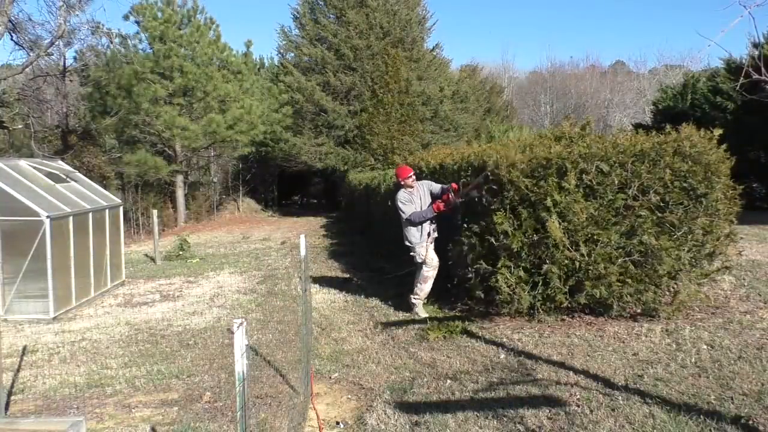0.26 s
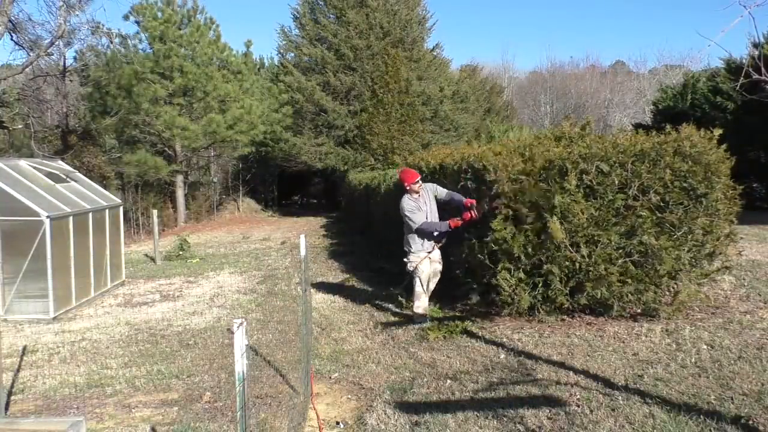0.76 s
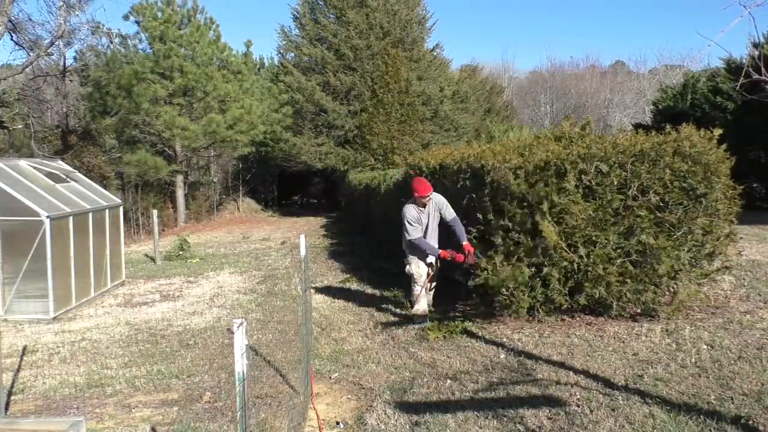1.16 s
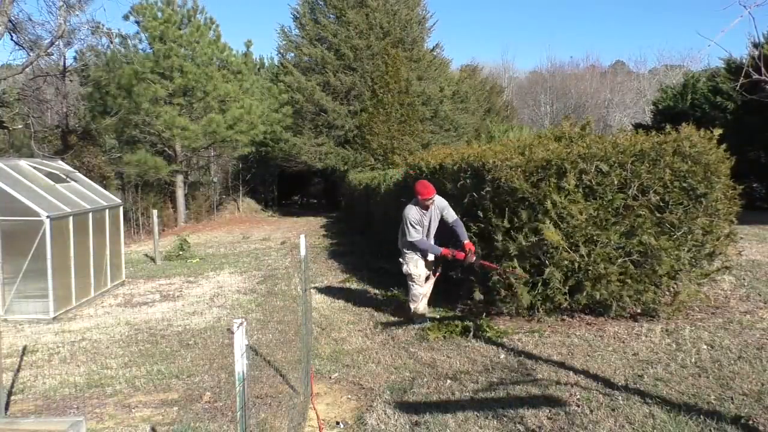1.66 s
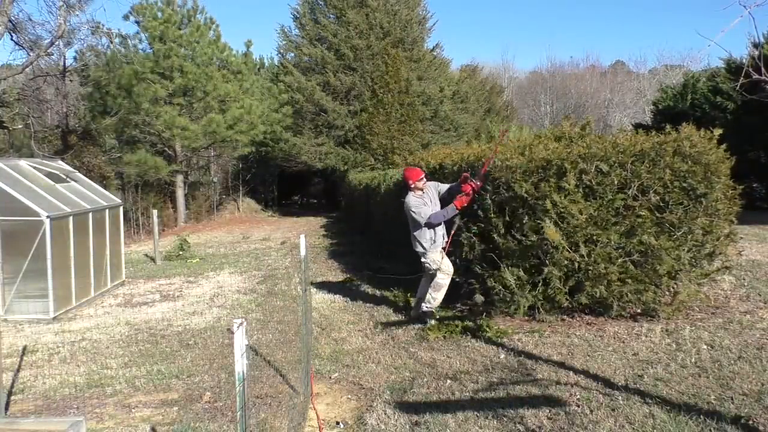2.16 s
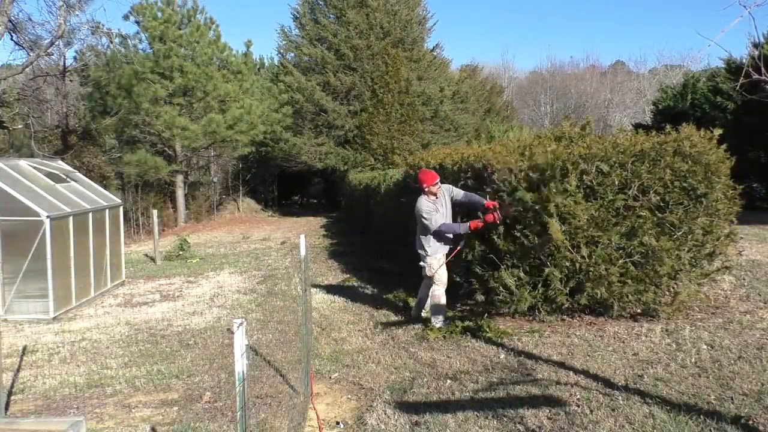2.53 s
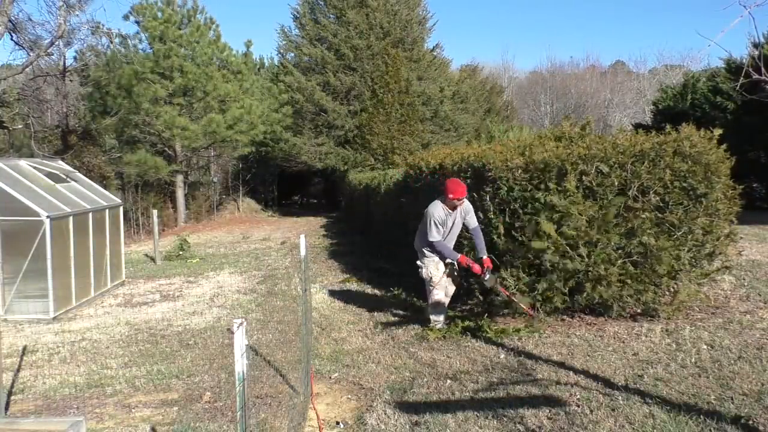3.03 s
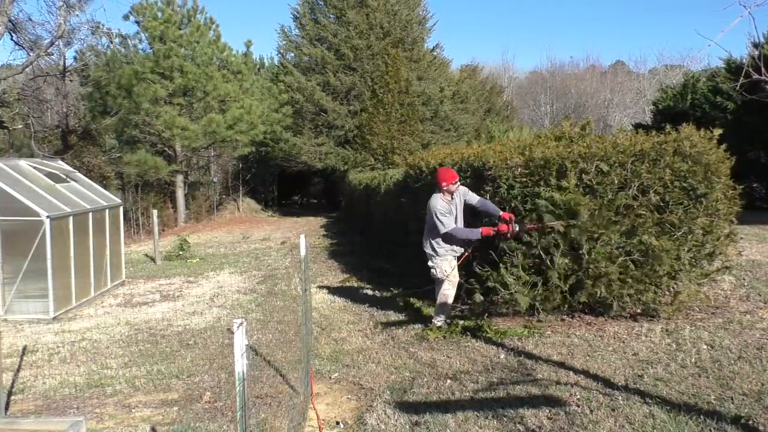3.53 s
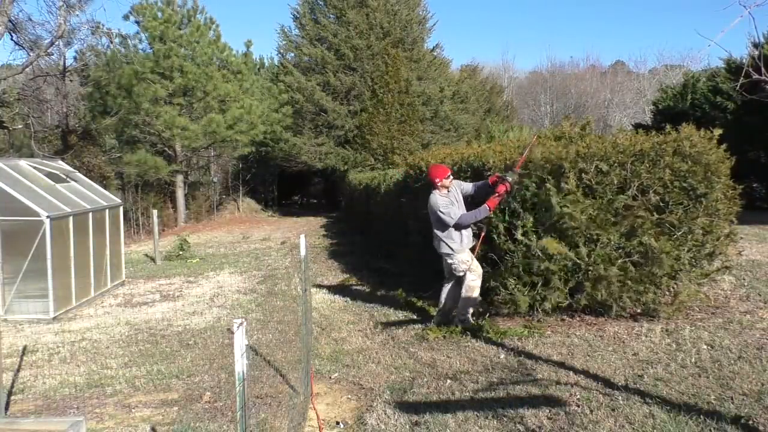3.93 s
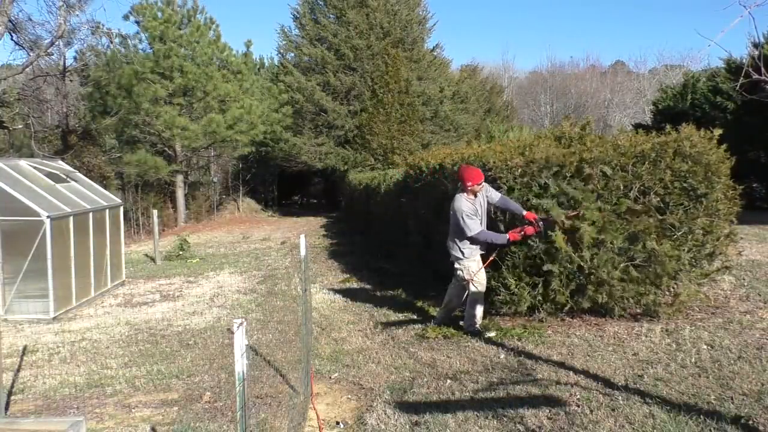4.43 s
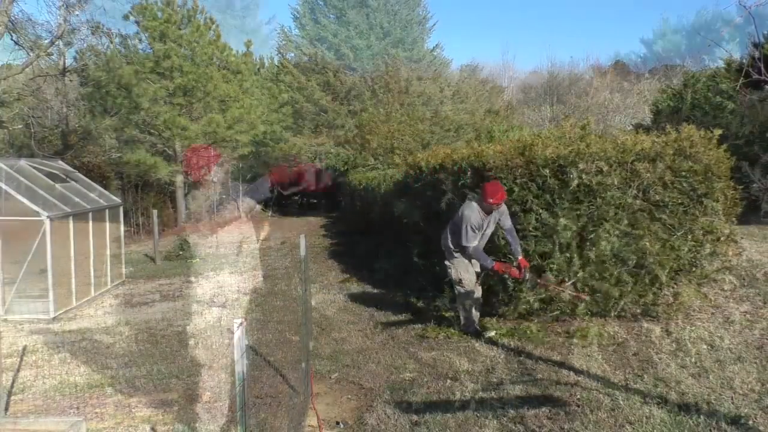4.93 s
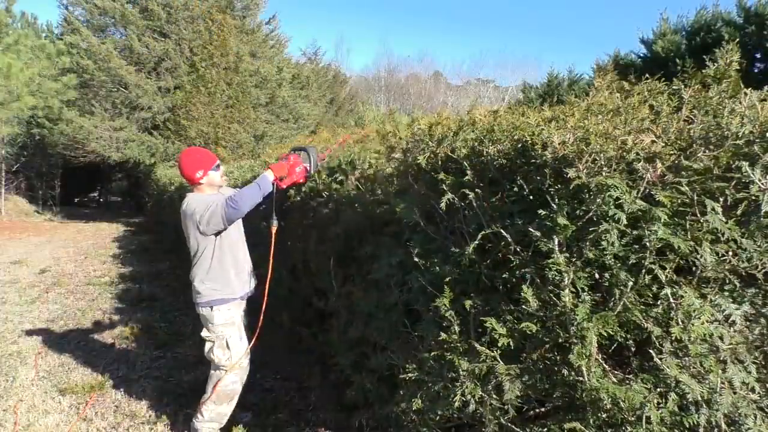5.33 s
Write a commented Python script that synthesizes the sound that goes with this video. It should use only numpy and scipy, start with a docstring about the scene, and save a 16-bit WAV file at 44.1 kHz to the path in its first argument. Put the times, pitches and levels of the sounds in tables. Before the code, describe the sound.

Continuous harsh buzz of a corded hedge trimmer outdoors: nasal motor whine, hollow plastic rattle and metallic scraping of fast blades. Pitch wavers about every second as foliage slows it, with small bright cracks of twigs. Around five seconds it labours to its lowest pitch with rough squeals, then quickly recovers as the microphone viewpoint moves closer. Dry open air, no room reverb, only a faint outdoor bed.

```python
"""In a garden, some metres away, a corded electric hedge trimmer sweeps up and down a thick hedge.
Shaft-locked tones make the gear, fan and commutator whine; they sag and fray under load.
Shaped noise, pulsed by the blade strokes, makes the rattle and the shearing; bursts make snaps and bites.
The rattle, cutting and snaps also echo off the lawn, so their colour sweeps as the tool rises and falls."""
import sys
import numpy as np
from scipy import signal
from scipy.fft import rfft, irfft, next_fast_len
from scipy.io import wavfile
from scipy.ndimage import uniform_filter1d, map_coordinates

SR = 44100
rng = np.random.default_rng(int(sys.argv[2]) if len(sys.argv) > 2 else 0)


def wav_record(signal):
    """Record a signal, one row per channel, as 16-bit PCM in the file named by sys.argv[1]."""
    frames = np.transpose(np.atleast_2d(signal))
    bounded = np.clip(frames, -1, 1)
    # unit amplitude maps onto the largest positive 16-bit level
    quanta = np.round(bounded * 32767).astype(np.int16)
    wavfile.write(sys.argv[1], SR, quanta)


N = 246519

PINION_TEETH, WHEEL_TEETH = 5, 49  # the shaft's pinion drives the crank wheel
FAN_BLADES = 6
COMMUTATOR_ORDER = 17  # cycles per shaft turn
LISTENER_HEIGHT_M, CHEST_HEIGHT_M = 1.5, 1.5
SOUND_M_PER_S = 343
TOP_HZ = 15750

# gearbox noise spectrum: freq_hz, relative_db
GEARBOX_SPECTRUM = [(100, -60), (500, -43), (1200, -11), (1650, 1), (2200, -0.5), (2750, 0.5), (3100, -2),
                    (4200, -6.5), (4900, -12.5), (6500, -14.5), (8000, -19.5), (15000, -25)]
# gear case resonances: centre_hz, width_hz, lift_db
GEAR_CASE_MODES = [(1881, 95, 7.5), (2299, 132, 8.5), (2740, 61, 3.5), (3510, 59, 4.5), (4310, 88, 4.5)]


def amp(db):
    """Decibels to gain."""
    return 10 ** (np.asarray(db) / 20)


def unit(x):
    """Scale to rms 1."""
    return x / np.sqrt(np.mean(x ** 2) + 1e-20)


def clock():
    """Time of every sample, s."""
    return np.arange(N) / SR


def curves(rows):
    """Linear per-sample curve for each column after the time."""
    time_s, *columns = np.transpose(rows)
    return [np.interp(clock(), time_s, column) for column in columns]


def eased(points):
    """Per-sample curve gliding smoothly between turning points."""
    time_s, values = np.transpose(points)
    index = np.arange(len(time_s))
    place = np.interp(clock(), time_s, index)
    glide = np.sin(np.pi / 2 * (place % 1)) ** 2
    return np.interp(np.floor(place) + glide, index, values)


def wobble(knots_per_s):
    """Smooth random curve through Gaussian knots."""
    knots = rng.standard_normal(N // 16)
    return map_coordinates(knots, [clock() * knots_per_s], mode="wrap")


def filtered(x, response):
    """Multiply the spectrum of x by a response of frequency in Hz."""
    size = next_fast_len(N + 8192)  # zero-padded
    freq_hz = np.fft.rfftfreq(size, 1 / SR)
    return irfft(rfft(x, size) * response(freq_hz), size)[:N]


def lift_db(freq_hz, modes):
    """Sum of the resonance peaks at a frequency, dB."""
    return sum(peak_db / (1 + (2 * (freq_hz - centre_hz) / width_hz) ** 2)
               for centre_hz, width_hz, peak_db in modes)


def coloured(x, spectrum, modes=()):
    """Shape x by a spectrum plus resonances, at rms 1."""
    knot_hz, knot_db = np.transpose(spectrum)

    def response(freq_hz):
        base_db = np.interp(np.log(freq_hz + 1), np.log(knot_hz), knot_db)
        return amp(base_db + lift_db(freq_hz, modes))

    return unit(filtered(x, response))


def noise(spectrum, modes=()):
    """Fresh coloured noise at rms 1."""
    return coloured(rng.standard_normal(N), spectrum, modes)


def swung(x, patchy_db):
    """Narrow bands swell and fade at random, at rms 1."""
    bins = signal.stft(x, nperseg=1024)[2]
    field = rng.standard_normal(bins.shape)
    field = uniform_filter1d(field, size=3, axis=0)  # across frequency
    field = uniform_filter1d(field, size=9, axis=1)  # across time
    return unit(signal.istft(bins * amp(patchy_db * unit(field)))[1][:N])


def strokes(turns, out_db, back_db):
    """Blade-stroke gain swinging at once and twice the crank rate."""
    crank_rad = 2 * np.pi * turns * PINION_TEETH / WHEEL_TEETH
    return unit(amp(out_db * np.cos(crank_rad) + back_db * np.cos(2 * crank_rad)))


def clack(turns, decay_strokes, depth):
    """Gain that jumps as the blades reverse, twice a crank turn, then dies away."""
    stroke = (2 * turns * PINION_TEETH / WHEEL_TEETH) % 1
    return unit(1 + depth * np.exp(-stroke / decay_strokes))


def tone(turns, order, rough, flutter_db, spread_hz):
    """Shaft order: a fluttering line with a skirt of narrow noise."""
    skirt = wobble(spread_hz) + 1j * wobble(spread_hz)
    line = (1 + rough * skirt) / np.sqrt(1 + 2 * rough ** 2)
    line = line * amp(flutter_db * wobble(35))
    return unit(np.real(line * np.exp(2j * np.pi * order * turns)))


def outdoor_air():
    """Faint, steady low-pitched noise of the open air."""
    # spectrum: freq_hz, relative_db
    air_spectrum = [(20, -16), (45, -4.5), (85, 0), (150, 0), (300, 2.5), (1000, -15), (8000, -39)]
    return amp(-69.0) * noise(air_spectrum)


def lawn(x, height_m, near, share, dull_hz, phase_rad):
    """Direct sound plus a grass echo, later for a higher tool; grass dulls it and holds back its phase."""
    far_m, near_m = 8.07, 4.4
    near_echo_db = -5  # grass returns less of a steep echo
    soft = filtered(x, lambda hz: share * np.exp(-1j * phase_rad) / (1 + (hz / dull_hz) ** 2))

    def echo(distance_m):
        extra_path_m = 2 * height_m * LISTENER_HEIGHT_M / distance_m
        lag_s = extra_path_m / SOUND_M_PER_S
        return map_coordinates(soft, [(clock() - lag_s) * SR], order=1)

    return x + (1 - near) * echo(far_m) + near * amp(near_echo_db) * echo(near_m)


def snaps(rise_s, t60_s):
    """Each thicker twig parts with one short, bright crack."""
    # snapping twigs: start_s, relative_level_db
    snap_rows = [(0.515, -24.5), (0.8127, -27), (1.1785, -19.5), (1.7612, -20), (2.8297, -24.5),
                 (3.3308, -27), (3.7611, -31), (4.4398, -22.5), (4.5201, -23.5), (4.792, -25),
                 (4.8239, -24.5)]
    spectrum = [(300, -50), (1500, -16), (5000, -10), (9000, 1), (12000, 3.5), (15700, -8)]
    force = np.zeros(N)
    for start_s, level_db in snap_rows:
        age_s = np.maximum(clock() - start_s, 0)
        force += amp(level_db - 60 * age_s / t60_s) * (1 - np.exp(-age_s / rise_s))
    return amp(-7.5) * force * noise(spectrum)


def bites(turns, width_s):
    """A branch between the teeth loads the gear, which rasps and squeals."""
    # bites into branches: centre_s, rasp_relative_db, mesh_db, mesh_octave_db
    bite_rows = [(4.333, -40, -54, -54), (4.356, -37, -59, -48), (4.412, -47, -52, -45),
                 (4.446, -47, -40, -40), (4.495, -44, -45, -43), (4.6, -40, -52, -55),
                 (4.797, -36.5, -37, -55), (4.831, -34.5, -33, -41), (4.871, -36, -46, -46),
                 (4.942, -32, -46, -31.5), (4.976, -35, -45, -40)]
    rasp, mesh, octave = sum(
        np.outer(amp(levels_db), np.exp(-((clock() - centre_s) / width_s) ** 2))
        for centre_s, *levels_db in bite_rows)
    squeal = mesh * tone(turns, order=PINION_TEETH, rough=.7, flutter_db=1, spread_hz=350)
    squeal += octave * tone(turns, order=2 * PINION_TEETH, rough=.35, flutter_db=1, spread_hz=250)
    return squeal + amp(2.5) * rasp * noise(GEARBOX_SPECTRUM, GEAR_CASE_MODES)


def cutting(turns, cut_db):
    """Foliage shears in tiny cracks; the steel blades scrape, and ring even when they run free."""
    # spectra of foliage, blades and ring: freq_hz, relative_db
    foliage_spectrum = [(300, -50), (2000, -13), (4500, -6), (6000, -8.5), (7700, -1.5), (8600, -1),
                        (10300, 0.5), (12000, -4.5), (15000, -15)]
    blade_spectrum = [(3000, -49), (7500, -23), (8700, -2), (10000, -7), (11500, -0.5), (13100, 0.5),
                      (13800, -6), (14700, -3.5), (15600, -8)]
    ring_spectrum = [(6000, -50), (8000, -22), (8520, 1.5), (8700, -1), (8880, 1), (9150, -19),
                     (12000, -45)]
    # blade resonances: centre_hz, width_hz, lift_db
    steel_modes = [(9900, 240, 8.3), (11500, 200, 1.5), (12960, 260, 4)]
    shear_db, scrape_db = -3.5, -2  # relative to the cutting level
    tufts_db = cut_db + 0.67 * wobble(22)  # the foliage comes in uneven tufts
    cracks = unit(amp(0.65 * wobble(1100) + 1.4 * wobble(90)))
    shear = amp(tufts_db + shear_db) * swung(noise(foliage_spectrum), patchy_db=4.0)
    scrape = amp(tufts_db + scrape_db) * swung(noise(blade_spectrum, steel_modes), patchy_db=2.4)
    ring = amp(-56.0) * swung(noise(ring_spectrum), patchy_db=4.5)
    chatter = clack(turns, decay_strokes=0.39, depth=0.26) * strokes(turns, out_db=0.6, back_db=0.1)
    return (shear + scrape + ring) * cracks * unit(chatter)


def rattle(turns, sag, cut_db):
    """Air and gear backlash shake the plastic housing and ring the gear case, more so in a hard cut."""
    # housing noise spectrum: freq_hz, relative_db
    housing_spectrum = [(100, -39.5), (190, -17.5), (260, -14.5), (360, -7), (450, -9.5), (600, 2),
                        (900, 1), (1100, 1), (1350, -3), (1800, -10), (3000, -31), (6000, -64)]
    # housing drone, loudest around the bottom of the sweeps: time_s, level_db
    drone_rows = [(0, -42), (.7, -41.5), (1.5, -39.5), (2.25, -41.5), (3.05, -37), (3.55, -40.5),
                  (4.05, -41), (4.6, -39.3), (5.05, -42), (5.59, -42)]
    housing_follows, gear_follows = 0.33, 0.23  # dB of shaking per dB of cutting
    gear_full_speed_db, gear_db_per_sag = -36.5, -1
    drone_db, = curves(drone_rows)
    effort_db = cut_db - cut_db.mean()
    housing_db = drone_db + housing_follows * effort_db + 0.77 * wobble(30)
    gear_db = gear_full_speed_db + gear_db_per_sag * sag
    gear_db = gear_db + gear_follows * effort_db + 0.68 * wobble(25)
    housing = amp(housing_db) * swung(noise(housing_spectrum), patchy_db=1)
    housing = housing * clack(turns, decay_strokes=0.25, depth=0.27)
    knocks = rng.standard_normal(N) * clack(turns, decay_strokes=0.16, depth=0.41)
    knocks = knocks * amp(0.85 * wobble(300))
    gear = swung(coloured(knocks, GEARBOX_SPECTRUM, GEAR_CASE_MODES), patchy_db=2.24)
    return housing + amp(gear_db) * gear


def whine_gain(rule, pitch_hz, sag, raised_m, near):
    """Whine gain follows load, height and nearness, and swells as its pitch crosses a case resonance."""
    full_speed_db, db_per_sag, ringing, db_per_m, near_db, drift_db = rule
    level_db = full_speed_db + db_per_sag * sag
    level_db = level_db + ringing * lift_db(pitch_hz, GEAR_CASE_MODES)
    level_db = level_db + db_per_m * raised_m + near_db * near
    return amp(level_db + drift_db * wobble(11))


def motor(speed, turns, sag, raised_m, near):
    """Gear mesh, fan and commutator sing over weaker shaft orders; load slows and frays them."""
    # gear mesh whine: time_s, level_db
    mesh_rows = [(0, -33), (.2, -37), (.33, -46.5), (.48, -30.5), (.6, -43), (.92, -37), (1.1, -51),
                 (1.5, -39.5), (1.68, -33.5), (1.78, -44), (1.88, -33.5), (2.12, -37), (2.3, -47),
                 (2.5, -41), (2.69, -37), (2.82, -51), (3.3, -36), (3.42, -45), (3.57, -29.5), (3.72, -42),
                 (3.88, -34.5), (4.1, -46.5), (4.7, -56), (5.14, -45), (5.3, -36), (5.59, -41)]
    # weak shaft orders: cycles_per_turn, full_speed_db
    hum_rows = [(2, -53.5), (3, -52.5), (4, -51), (7, -49), (11, -59.5), (12, -58), (15, -61)]
    # whine rules: full_speed_db, db_per_sag, case_lift_share, db_per_m_raised, near_db, drift_db
    fan_rule = (-46.5, -53, 1.09, 4, -2, 2.5)
    octave_rule = (-51, 2, -0.2, -1.5, 4, 2)
    commutator_rule = (-55, -130, .2, 0, 5, 2)
    hum_db_per_sag = -39
    shaft_db = -61  # rotor imbalance, once a turn
    fray = .28 + 2.5 * sag

    def line(order, flutter_db, spread_hz):
        return tone(turns, order, fray, flutter_db, spread_hz)

    def gain(rule, order):
        return whine_gain(rule, order * speed, sag, raised_m, near)

    mesh_db, = curves(mesh_rows)
    mesh = amp(mesh_db) * line(PINION_TEETH, flutter_db=2.5, spread_hz=170)
    octave_order = 2 * PINION_TEETH
    octave = gain(octave_rule, octave_order) * line(octave_order, flutter_db=2.5, spread_hz=200)
    fan = gain(fan_rule, FAN_BLADES) * line(FAN_BLADES, flutter_db=2.0, spread_hz=160)
    whistle = gain(commutator_rule, COMMUTATOR_ORDER)
    whistle = whistle * line(COMMUTATOR_ORDER, flutter_db=3.5, spread_hz=120)
    hum = sum(amp(db) * line(round(order), flutter_db=1.5, spread_hz=90) for order, db in hum_rows)
    shaft = amp(shaft_db) * line(1, flutter_db=1.5, spread_hz=60)
    gears = (mesh + octave) * strokes(turns, out_db=-0.6, back_db=-0.4)
    return gears + fan + whistle + amp(hum_db_per_sag * sag) * hum + shaft


def scene():
    """One motor shaft drives every part of the tool; faint outdoor air lies beneath."""
    # motor sagging in the hedge and recovering: time_s, shaft_turns_per_s
    speed_rows = [(0, 369), (.17, 323), (.6, 387), (1.07, 311), (1.22, 317), (1.45, 370), (1.66, 389),
                  (1.88, 364), (2.12, 379), (2.42, 391), (2.66, 335), (3.0, 372), (3.43, 387), (3.68, 363),
                  (3.9, 350), (4.17, 381), (4.46, 316), (4.7, 313), (4.99, 253), (5.03, 258), (5.08, 338),
                  (5.39, 378), (5.59, 379)]
    # top and bottom of each sweep: time_s, tool_height_m
    height_rows = [(0, 1.62), (.55, 1.91), (1.5, 0.84), (2.26, 1.975), (3.22, 0.88), (3.99, 2.02),
                   (4.85, 1.155), (5.25, 1.83)]
    # the sound blends from far off to close by: time_s, nearness_0_to_1
    nearness_rows = [(4.85, 0.03), (5.2, 1)]
    # how hard the blades cut: time_s, level_db
    cutting_rows = [(0.0, -43.5), (0.45, -43.5), (0.51, -41.5), (1.09, -43.5), (1.23, -42), (1.28, -46),
                    (1.63, -41.5), (1.76, -37.5), (1.91, -45.5), (2.01, -40), (2.3, -48.5), (2.48, -40),
                    (2.94, -45), (3.14, -38), (3.21, -44.5), (3.53, -41), (4.13, -45), (4.19, -39.5),
                    (4.39, -45), (4.51, -41.5), (4.75, -45), (4.81, -42.5), (5.17, -46), (5.59, -44)]
    speed = eased(speed_rows) * (1 + 0.004 * wobble(30))  # twigs tug at the motor
    turns = np.cumsum(speed) / SR
    sag = 1 - speed / speed.max()  # share of top speed lost to load
    height_m = eased(height_rows)
    raised_m = height_m - CHEST_HEIGHT_M
    near, = curves(nearness_rows)
    cut_db, = curves(cutting_rows)
    broad = rattle(turns, sag, cut_db) + cutting(turns, cut_db) + snaps(rise_s=.001, t60_s=0.036)
    tool = lawn(broad, height_m, near, share=0.66, dull_hz=1730, phase_rad=0.46)
    tool = tool + motor(speed, turns, sag, raised_m, near) + bites(turns, width_s=0.0072)
    mono = tool + outdoor_air()
    return np.array([mono, mono])


def record(dry):
    """Cut everything from the band limit up."""
    return np.array([filtered(channel, lambda hz: hz < TOP_HZ) for channel in dry])


dry = scene()
out = record(dry)
wav_record(out)
```